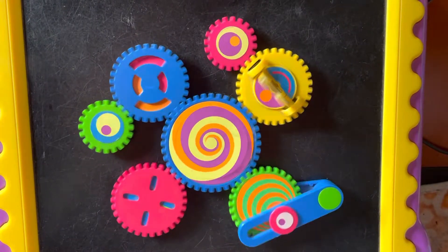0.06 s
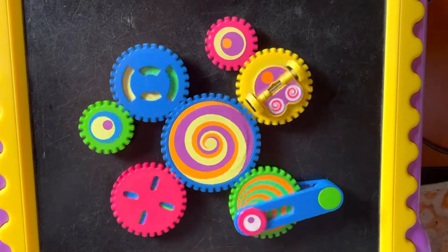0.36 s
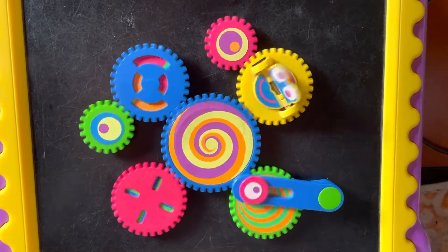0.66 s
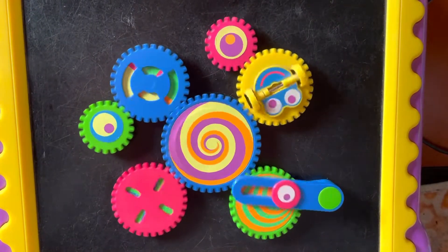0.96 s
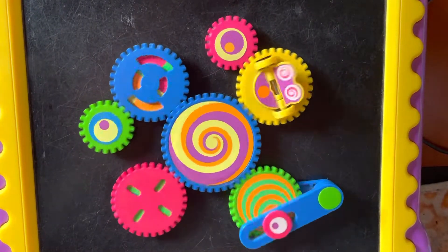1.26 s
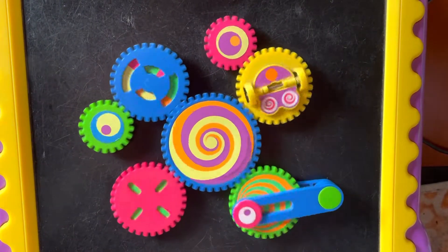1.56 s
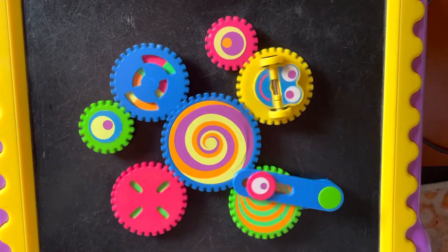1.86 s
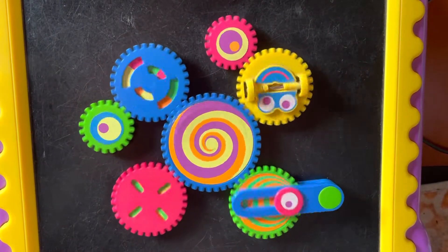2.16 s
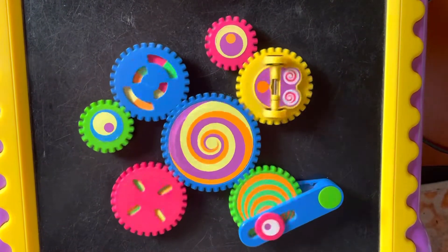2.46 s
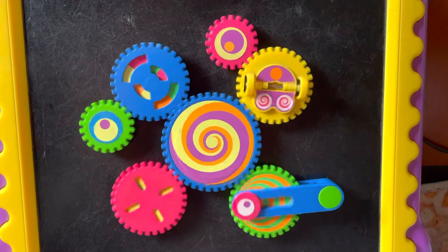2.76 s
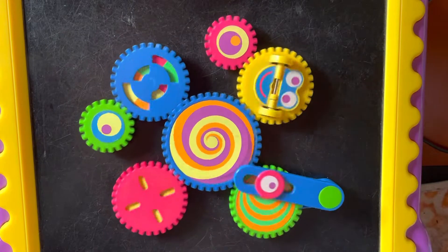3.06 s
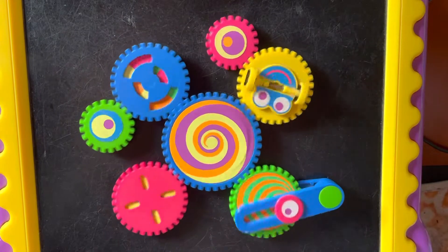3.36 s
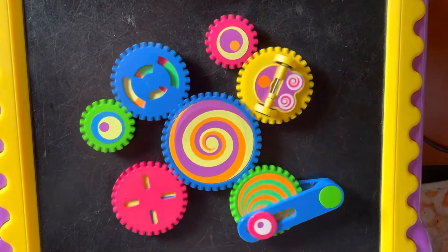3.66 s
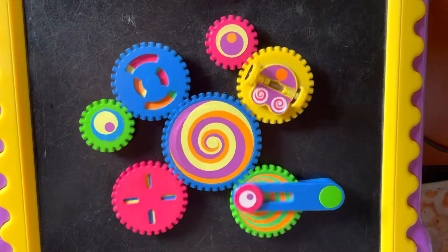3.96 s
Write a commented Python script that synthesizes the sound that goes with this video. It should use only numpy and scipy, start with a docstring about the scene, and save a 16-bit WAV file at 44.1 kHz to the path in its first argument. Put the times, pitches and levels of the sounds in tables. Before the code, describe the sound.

Plastic toy gears grind and chatter for the whole four seconds, with a faint motor whine and a hollow board droning beneath. A plastic flap snaps sharply at about 0.1, 0.7, 1.3, 1.8, 2.4, 3.0 and 3.6 seconds, each snap followed by a softer rebound. Lighter ticks and tiny squeaks from the teeth fall in between. The room sounds small, with little echo.

```python
"""Indoors, in a small room: a battery motor turns plastic toy gears on a hollow board.
A hinged flap on one gear tips over every half turn: a sharp snap, then a softer rebound,
sometimes a faint ringing second one.
The teeth grind, chatter, catch, ping and squeak; their contacts make the board drone and boom.
The motor whines at multiples of its shaft speed, over faint hiss and mains hum."""
import sys
import numpy as np
from scipy import signal
from scipy.fft import rfft, irfft
from scipy.io import wavfile
from scipy.ndimage import uniform_filter1d

SR = 44100
rng = np.random.default_rng(int(sys.argv[2]) if len(sys.argv) > 2 else 0)


def store_wav(level_fs):
    """Save 16-bit WAV to argv[1]."""
    pcm = np.round(np.clip(np.atleast_2d(level_fs), -1, 1) * 32767)
    wavfile.write(sys.argv[1], SR, pcm.T.astype(np.int16))


N = 176400
T = np.arange(N) / SR

# flap landings and first bounces: start_s, level_db
FLAP_SNAPS = [(0.1441, -1.1), (0.7078, 0.5), (1.2864, 1), (1.8363, -1), (2.4181, 0), (2.9710, 1.8),
              (3.5502, 0)]
FLAP_REBOUNDS = [(0.2044, -11.5), (0.7672, -12), (1.3477, -8.5), (1.8927, -12), (2.4642, -9.5),
                 (3.0228, -13), (3.6070, -10)]
# flap resonances: pitch_hz, level_db, t60_s
FLAP_RESONANCES = [(4630, -24, 0.024), (4790, -27, .026), (5445, -14.5, 0.021), (6605, -25.5, 0.02),
                   (7170, -28.5, 0.03), (8742, -25, .022), (9238, -20, 0.018), (9830, -16, 0.014),
                   (10270, -32, .03), (11300, -18, 0.009), (12100, -24, .012), (13000, -25, .017)]
# dense ring of the flap's gear: freq_hz, level_db
CRACK_SPECTRUM = [(500, -42), (1200, -31), (2200, -9), (3900, -30), (4600, -24), (6000, 12), (9700, 0),
                  (10500, -71), (11400, 3.5), (13000, 4), (15400, 3), (16500, 10)]

# swells of board and teeth: time_s, level_db
BOOM_ENVELOPE = [(0, -58), (.7, -53), (.9, -41.5), (1.15, -42), (1.42, -38), (1.53, -38), (1.62, -54),
                 (2.18, -51), (2.3, -40.5), (2.83, -45), (3.05, -50), (3.5, -50), (3.65, -39.5), (4, -41)]
DRONE_ENVELOPE = [(0, -38.5), (.16, -37.5), (.23, -42), (.4, -42), (.5, -47.5), (.62, -39.5), (.76, -41),
                  (.96, -36.5), (1.08, -43), (1.25, -36), (1.52, -39), (1.59, -47.5), (1.77, -36),
                  (1.93, -41), (2.19, -41.5), (2.28, -38.5), (2.8, -39.5), (3.03, -40.5), (3.45, -39),
                  (4, -40.5)]
GRIND_ENVELOPE = [(0, -33.5), (.06, -39.5), (.15, -37.5), (.22, -40), (.51, -42.5), (.58, -39),
                  (.75, -38.5), (1.0, -38), (1.22, -36.5), (1.5, -38), (1.62, -43.5), (1.71, -36.5),
                  (1.95, -41), (2.3, -38), (2.55, -40), (2.9, -37), (3.06, -40), (3.27, -39.5), (3.45, -39),
                  (4, -38.5)]
CHATTER_ENVELOPE = [(0, -42), (.13, -39), (.22, -49), (.58, -44.5), (.92, -47), (1.15, -39.5), (1.4, -44.5),
                    (1.63, -49), (1.72, -42.5), (1.95, -49), (2.3, -39.5), (2.58, -47), (2.88, -39),
                    (3.05, -47), (3.3, -47), (3.46, -40), (3.6, -47), (4, -44)]
# timbres of board and teeth: freq_hz, level_db
BOOM_SPECTRUM = [(30, -56.5), (190, -10), (242, 2.5), (300, -6), (500, -43.5)]
DRONE_SPECTRUM = [(30, -62.5), (55, -16.5), (100, -13.5), (170, -6.5), (260, -6.5), (315, 3), (360, 3.5),
                  (410, -4), (470, -4), (530, -21.5), (900, -41)]
GRIND_SPECTRUM = [(200, -16.5), (450, -1), (600, 1), (780, -0.5), (900, 3), (1020, 1), (1150, 5), (1250, 4),
                  (1370, -2.5), (1550, 0.5), (1690, 2), (1900, -3.5), (2170, 0.5), (2400, -11),
                  (2700, -16.5), (3300, -13.5), (6000, -31)]
CHATTER_SPECTRUM = [(1500, -7.5), (2600, 4.5), (3100, 9), (3280, -0.5), (3850, -1), (4720, 4.5),
                    (5150, -5.5), (5480, 4), (6200, -8), (6620, -1.5), (7600, -17), (11000, -18.5),
                    (14000, -35)]

# teeth and sliding arm catching: start_s, body_db, edge_db
CATCH_HITS = [(0.011, -14, -13), (0.5401, -21, -17), (0.587, -14, -15), (1.099, -16, -14.5),
              (1.120, -20, -14), (1.463, -13, -16.5), (1.676, -15, -14.5), (1.708, -30, -15.5),
              (2.2323, -8.5, -11), (2.263, -17.5, -18), (2.634, -13, -15), (2.813, -31, -13),
              (2.867, -18, -17), (3.361, -13, -17), (3.383, -29, -13), (3.733, -11.5, -16),
              (3.851, -14.5, -15), (3.946, -20, -13)]
# timbres of a catch: freq_hz, level_db
CATCH_BODY_SPECTRUM = [(300, -50), (1200, -8), (2400, 10.5), (3050, 16.5), (3700, 14), (4700, -28),
                       (6000, 11), (12000, -29)]
CATCH_EDGE_SPECTRUM = [(2500, -12.5), (4200, 2), (5450, 9), (6100, -9.5), (7100, 1.5), (9000, 4),
                       (13000, -13), (16000, -29)]
# gear resonances: pitch_hz, level_db, t60_s
GEAR_RESONANCES = [(2700, -3, .022), (3060, 1.5, 0.026), (4200, -9, .022), (4720, -3, 0.022),
                   (5440, -3, 0.033), (7100, -12, .03)]
# clearest pings, from gear ticks and the flap's faint second rebounds: start_s, pitch_hz, peak_db
CLEAR_PINGS = [(.015, 5560, -35), (.354, 5430, -39.5), (1.016, 3010, -37), (1.051, 3060, -35),
               (1.076, 4220, -38), (1.369, 5450, -37), (2.185, 3060, -37), (2.344, 3010, -36),
               (2.496, 5450, -37.5), (3.045, 5450, -38), (3.786, 3010, -36)]
# sticking teeth: centre_s, level_db
TOOTH_SQUEAKS = [(.072, -44), (0.118, -32), (.554, -31), (.590, -28), (0.619, -30), (1.182, -29),
                 (1.221, -28.5), (1.680, -30), (1.713, -37), (1.744, -32.5), (2.348, -31), (2.872, -37),
                 (2.890, -27.5), (2.927, -35), (3.479, -36), (3.953, -32)]

# motor shaft: time_s, turns_per_s
SHAFT_SPEED = [(0, 143.3), (.2, 142.8), (1.6, 142.9), (2.15, 143.6), (2.5, 143.3), (2.88, 142.4),
               (3.15, 143.7), (4, 143.3)]
# motor whine: shaft_multiple, level_db
WHINE_HARMONICS = [(1, -59), (2, -47.5), (3, -52.5), (4, -51), (5, -53), (8, -55.5), (10, -54), (12, -63.5),
                   (14, -59.5), (15, -55.5), (25, -61.5)]
# background hiss: freq_hz, level_db
HISS_SPECTRUM = [(25, -45), (55, 2), (200, -10), (1000, -2.5), (5000, -25.5), (7500, -26), (11000, -13.5),
                 (13000, -27), (14500, -64)]

# stereo spread of the gears: freq_hz, side_db
GEAR_WIDTH = [(80, -14), (250, -22.5), (700, -6.5), (1400, -7.5), (2800, -7), (5500, -8.5), (10000, -108)]
# microphone port balance: freq_hz, left_over_right_db
PORT_BALANCE = [(100, -1), (350, 0.5), (700, 1.5), (1200, 2), (1700, 3), (2300, 5.5), (3000, -1), (4000, 1),
                (5000, 4), (6000, 1.5), (7200, 1), (9000, -0.5), (14000, 0.5)]
# microphone port phase: freq_hz, left_lead_rad
PORT_LEAD = [(20, 0), (500, .05), (1500, .5), (2500, .5), (4000, .1), (4850, .6), (5770, -.2), (6800, -.8),
             (8250, -3.1), (10500, -5.5), (13000, -7.3), (15000, -9.4), (16500, -10.3)]


def flap():
    """The flap lands with a snap, then rebounds softer and duller."""
    dull = signal.butter(1, 11500, fs=SR)
    return bend(flap_hits(FLAP_SNAPS) + signal.lfilter(*dull, flap_hits(FLAP_REBOUNDS)))


def flap_hits(rows, edge_db=-3, crack_db=4):
    """Each landing rings all flap modes with a hard edge and leaves a short crack in the gear."""
    impacts = clicks(*np.transpose(rows))
    modes = sum(from_db(db) * ring(impacts, hz, t60_s) for hz, db, t60_s in FLAP_RESONANCES)
    low_cut = signal.butter(10, 4600, "high", fs=SR, output="sos")
    snap = signal.sosfilt(low_cut, modes + from_db(edge_db) * impacts)
    crack = colour(burst(impacts, t60_s=.0057), CRACK_SPECTRUM)
    return snap + from_db(crack_db) * crack


def bend(x, centre_hz=5100, width_hz=950):
    """Bending waves run slower at low pitch: two allpasses delay the lowest flap modes about 1 ms."""
    r = np.exp(-np.pi * width_hz / SR)
    a = [1, -2 * r * np.cos(2 * np.pi * centre_hz / SR), r * r]
    return signal.lfilter(a[::-1], a, signal.lfilter(a[::-1], a, x))


def gears(shaft_rad):
    """Tooth contacts shake the board, grind and chatter; the board booms as the train labours."""
    boom = board(BOOM_SPECTRUM, BOOM_ENVELOPE)
    drone = board(DRONE_SPECTRUM, DRONE_ENVELOPE)
    return boom + drone + grind(shaft_rad) + chatter()


def board(spectrum, envelope):
    """Dense thumps drive the hollow board's resonances."""
    thumps = grains(per_s=900, spread_db=1.45)
    return even(colour(thumps, spectrum)) * from_db(in_time(envelope))


def grind(shaft_rad, cogging_depth=.15, flutter_db=1.73):
    """Teeth grind in step with the motor's three poles."""
    cogging = 1 + cogging_depth * np.cos(3 * shaft_rad)
    contacts = grains(per_s=4500, spread_db=3) * cogging
    level_db = in_time(GRIND_ENVELOPE) + flutter_db * drift(28)
    return even(colour(contacts, GRIND_SPECTRUM)) * from_db(level_db)


def chatter(rub_db=-3.5, gain_db=-5.5):
    """Teeth tick lightly and rub."""
    ticks = burst(grains(per_s=105, spread_db=2.6), t60_s=.014)
    rub = from_db(rub_db) * rng.standard_normal(N)
    return colour(rms_one(ticks + rub), CHATTER_SPECTRUM) * from_db(gain_db + in_time(CHATTER_ENVELOPE))


def catches(t60_s=.026):
    """Plastic ticks as slack in the train is taken up."""
    start_s, body_db, edge_db = np.transpose(CATCH_HITS)
    body = colour(burst(clicks(start_s, body_db), t60_s), CATCH_BODY_SPECTRUM)
    edge = colour(burst(clicks(start_s, edge_db), t60_s), CATCH_EDGE_SPECTRUM)
    return body + edge


def pings(gain_db=-8, rise_s=.002):
    """Single-pitch pings: gear ticks and the flap's faint, ringing second rebounds."""
    modes = sum(from_db(db) * rms_one(ring(grains(per_s=28, spread_db=2.2), hz, t60_s))
                for hz, db, t60_s in GEAR_RESONANCES)
    out = even(modes) * from_db(gain_db + in_time(CHATTER_ENVELOPE))
    for start_s, hz, db in CLEAR_PINGS:
        age = np.clip((T - start_s) / rise_s, 0, 20)
        out += from_db(db) * age * np.exp(1 - age) * np.sin(2 * np.pi * hz * (T - start_s))
    return out


def squeaks(pitch_hz=4720, pitch_spread=.015, rise_hz_per_s=19000, wobble_hz=93, width_s=.0034):
    """Plastic sticks and slides on plastic: short, scratchy rising chirps."""
    out = np.zeros(N)
    wobble_cycles = np.cumsum(wobble_hz * drift(127)) / SR
    grip = np.abs(np.tanh(drift(250)))
    for centre_s, db in TOOTH_SQUEAKS:
        near = np.abs(T - centre_s) < 5 * width_s
        t = T[near] - centre_s
        hz = pitch_hz * (1 + pitch_spread * rng.standard_normal())
        cycles = hz * t + rise_hz_per_s * t ** 2 / 2 + wobble_cycles[near]
        envelope = from_db(db) * grip[near] * np.exp(-(t / width_s) ** 2)
        out[near] += envelope * np.sin(2 * np.pi * cycles)
    return out


def motor(shaft_rad, flutter_db=1.2):
    """Whine: fluttering harmonics of the shaft's turn."""
    out = np.zeros(N)
    for multiple, db in WHINE_HARMONICS:
        amplitude = np.sqrt(2) * from_db(db + flutter_db * drift(8.7))
        out += amplitude * np.sin(multiple * shaft_rad + rng.uniform(0, 2 * np.pi))
    return out


def background(hiss_db=-52, hum_db=-59.5, hum_hz=120.3):
    """Faint hiss and mains hum."""
    hiss = from_db(hiss_db) * colour(rng.standard_normal(N), HISS_SPECTRUM)
    hum = np.sqrt(2) * from_db(hum_db) * np.sin(2 * np.pi * hum_hz * T)
    return hiss + hum


def reverb(x, t60_s=.13):
    """Diffuse tail of a small room."""
    tail = rng.standard_normal(SR // 2) * from_db(-60 * T[:SR // 2] / t60_s)
    return signal.fftconvolve(x, tail / np.linalg.norm(tail))[:N]


def clicks(start_s, level_db):
    """One impulse per contact."""
    out = np.zeros(N)
    out[np.round(start_s * SR).astype(int)] = from_db(level_db)
    return out


def grains(per_s, spread_db):
    """Random contacts, mostly weak, a few strong; unit rms."""
    sizes = from_db(spread_db * np.minimum(rng.exponential(1, N), 4))
    signs = rng.choice([-1, 1], N)
    return rms_one(sizes * signs * (rng.random(N) < per_s / SR))


def ring(x, pitch_hz, t60_s):
    """One mode: a unit click starts a decaying sine of height 1."""
    r, w = from_db(-60 / (t60_s * SR)), 2 * np.pi * pitch_hz / SR
    return signal.lfilter([0, np.sin(w)], [1, -2 * r * np.cos(w), r * r], x + 1e-18)


def burst(x, t60_s):
    """Each contact starts a dying hiss of many close modes; energy is kept."""
    r = from_db(-120 / (t60_s * SR))
    power = signal.lfilter([1 - r], [1, -r], x ** 2 + 1e-18)
    return rng.standard_normal(N) * np.sqrt(power)


def colour(x, spectrum):
    """Minimum-phase filter of unit power gain."""
    gain = rms_one(from_db(per_bin(spectrum)))
    cepstrum = irfft(np.log(gain))[:N]
    cepstrum[1:] *= 2
    return irfft(rfft(x, 2 * N) * np.exp(rfft(cepstrum, 2 * N)))[:N]


def drift(corner_hz):
    """Low-passed noise, unit rms."""
    r = np.exp(-2 * np.pi * corner_hz / SR)
    return rms_one(signal.lfilter([1], [1, -2 * r, r * r], rng.standard_normal(N + SR))[SR:])


def even(x):
    """Hold unit rms over a sliding 1/9 s."""
    return x / np.sqrt(uniform_filter1d(x ** 2, size=SR // 9) + 1e-12)


def rms_one(x):
    """Scale to unit rms."""
    return x / np.sqrt(np.mean(x ** 2) + 1e-20)


def from_db(db):
    """Decibels to gain."""
    return 10 ** (np.asarray(db) / 20)


def in_time(rows):
    """Time table read at every sample."""
    return np.interp(T, *np.transpose(rows))


def per_bin(rows):
    """Table over log frequency, read on the padded FFT grid."""
    hz, value = np.transpose(rows)
    bin_hz = np.arange(N + 1) * SR / (2 * N)
    return np.interp(np.log(bin_hz + 1e-9), np.log(hz), value)


def scene(speed_wobble=.0015, room_db=-23):
    """Hits sit in the centre and excite the room; the gears spread over the board."""
    turns_per_s = in_time(SHAFT_SPEED) * (1 + speed_wobble * drift(12.8))
    shaft_rad = 2 * np.pi * np.cumsum(turns_per_s) / SR
    hits = flap() + catches() + pings() + squeaks()
    room = from_db(room_db) * np.array([reverb(hits), reverb(hits)])
    side = irfft(rfft(gears(shaft_rad), 2 * N) * from_db(per_bin(GEAR_WIDTH)))[:N]
    mid = hits + motor(shaft_rad) + gears(shaft_rad) + background()
    return mid + room + np.array([side, -side])


def record(dry, clip_level=.85, stopband_hz=17000):
    """Two microphone ports differ in level and phase; peaks are clipped and the top is cut."""
    balance = from_db(per_bin(PORT_BALANCE) / 2)
    ports = np.array([balance * np.exp(1j * per_bin(PORT_LEAD)), 1 / balance])
    heard = irfft(rfft(dry, 2 * N) * ports)[:, :N]
    top_cut = signal.cheby2(14, 70, stopband_hz, fs=SR, output="sos")
    return signal.sosfilt(top_cut, np.clip(heard, -clip_level, clip_level))


dry = scene()
out = record(dry)
store_wav(out)
```